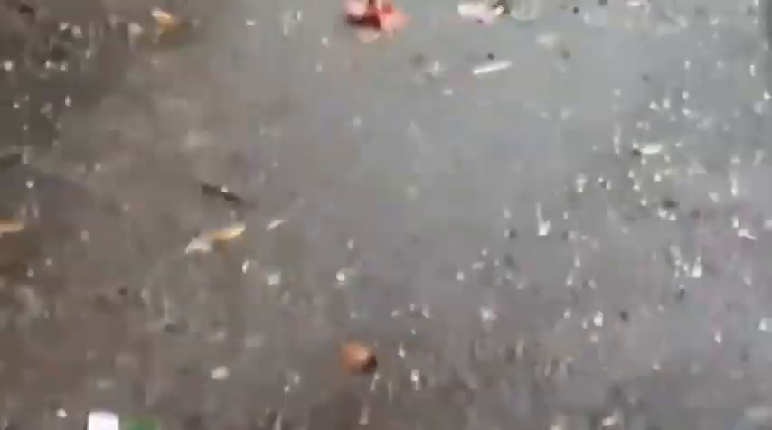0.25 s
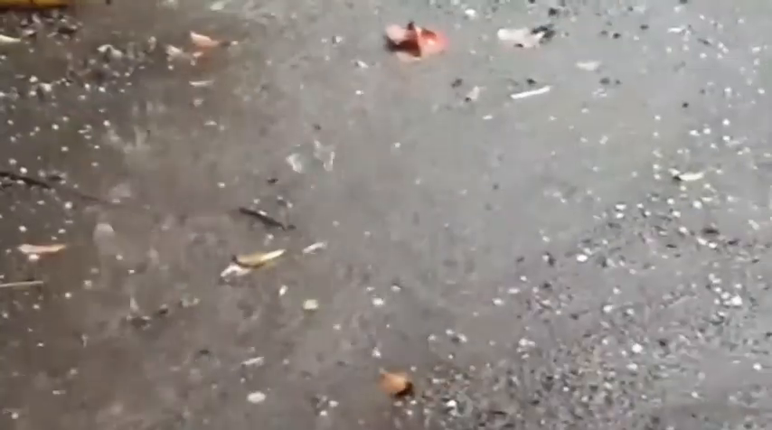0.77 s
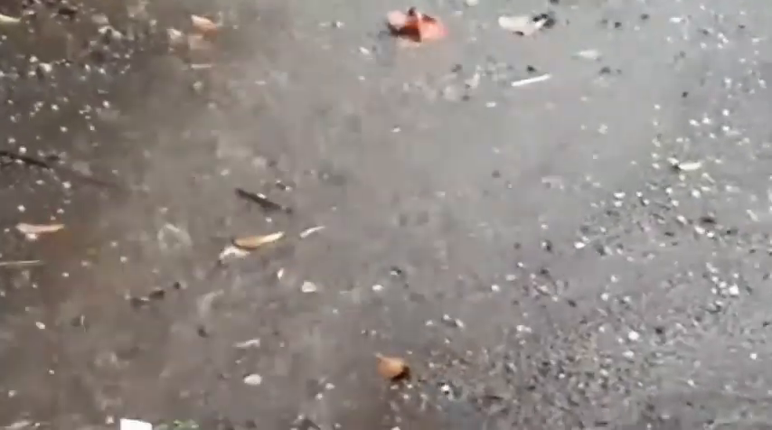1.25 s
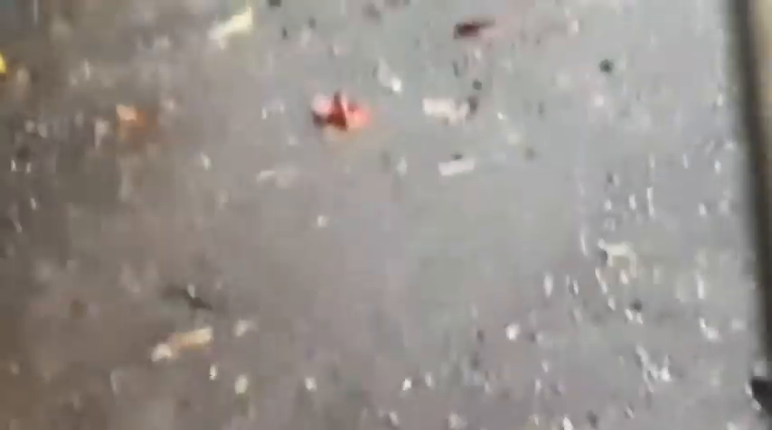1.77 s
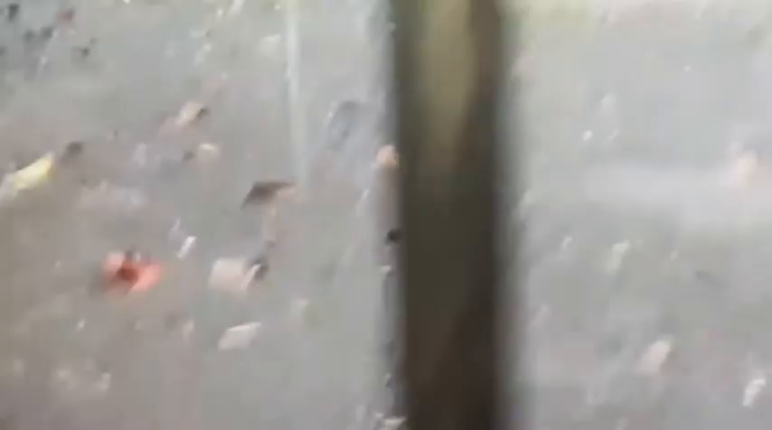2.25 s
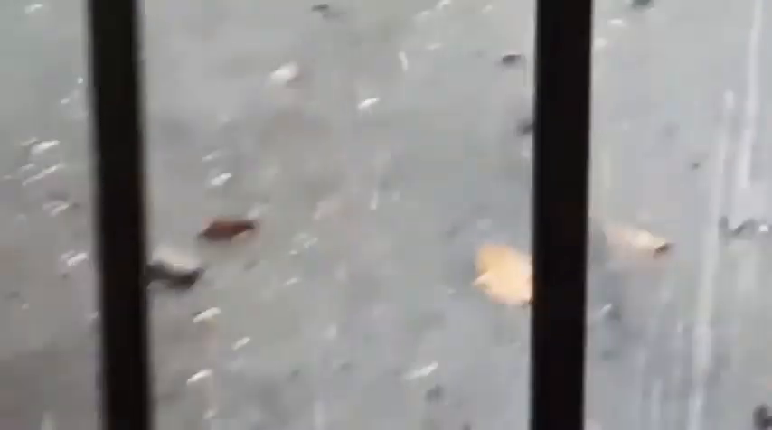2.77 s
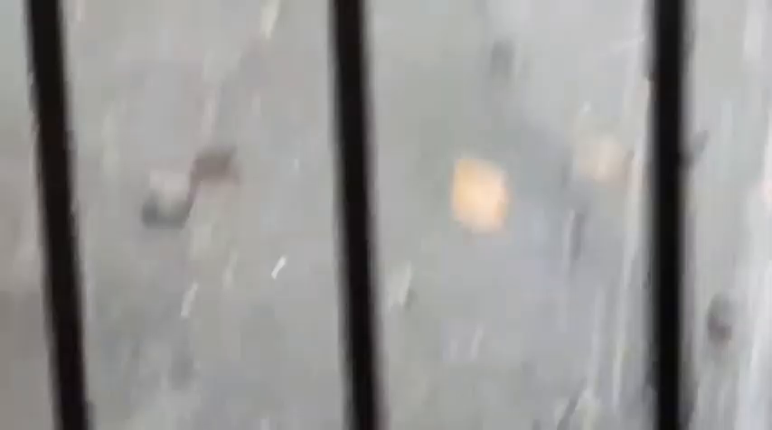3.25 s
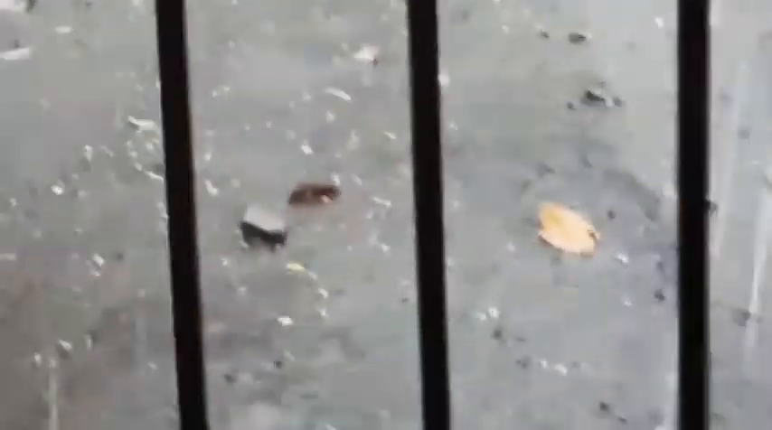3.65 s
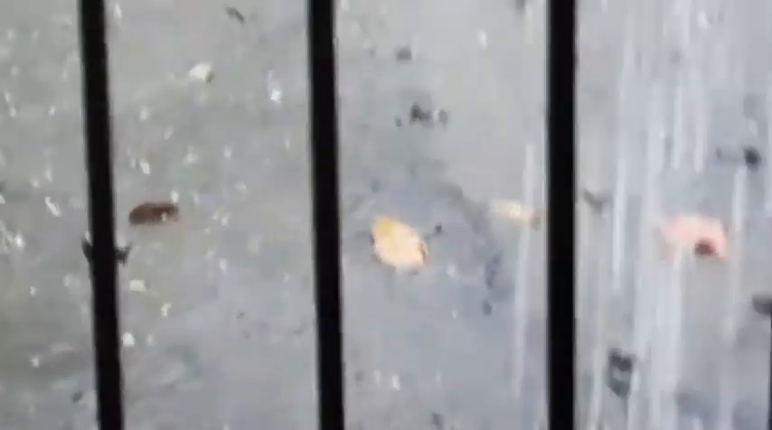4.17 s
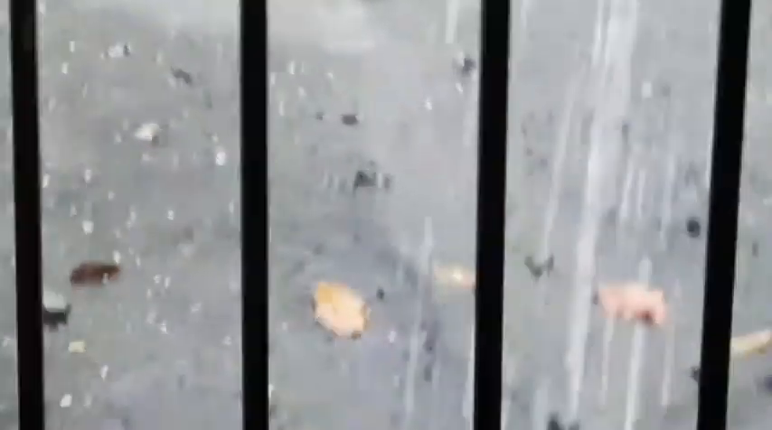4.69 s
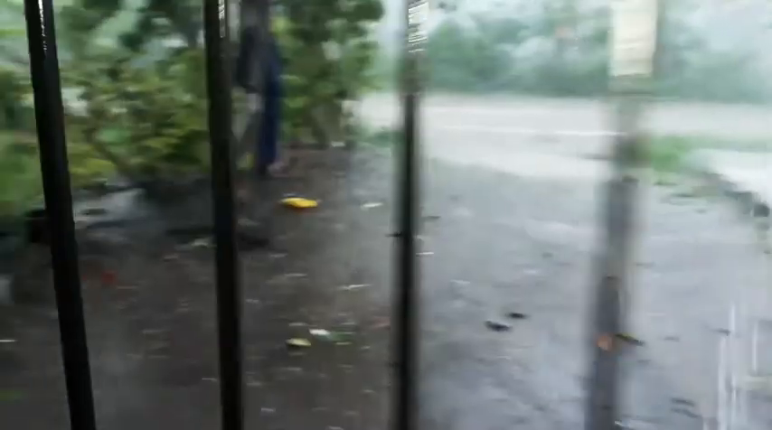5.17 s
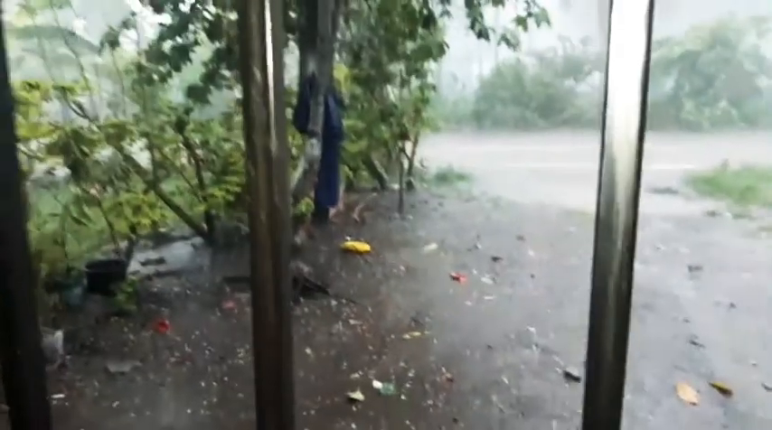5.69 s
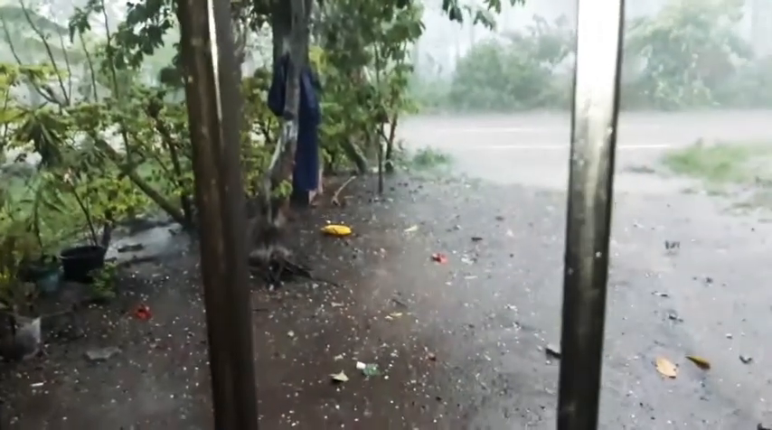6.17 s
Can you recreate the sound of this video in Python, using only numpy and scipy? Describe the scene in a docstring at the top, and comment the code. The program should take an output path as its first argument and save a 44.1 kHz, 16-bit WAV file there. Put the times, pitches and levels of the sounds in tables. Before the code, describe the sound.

Continuous hailstorm outdoors under a sheltering roof. Countless tiny ice hits merge into a rough roar, with uneven bursts of clatter, dull thuds, wet splats and crisp ticks standing out near the microphone. The fall eases midway and strengthens again. Near the end the sound vanishes for a twentieth of a second, then comes back stronger and steadier, facing an open yard with bushes.

```python
"""Hail and heavy rain, heard from a barred doorway over a wet concrete yard with bushes.
Countless random impacts, coloured by the surface they hit, merge into a roar; damped tones tick through it.
The roof drums, big stones burst into clatter and thud, water slaps the ground, lone hits crack and knock.
The fall slackens midway; near the end the sound drops out for an instant and returns facing the open yard."""
import sys
import numpy as np
from scipy import signal
from scipy.fft import rfft, irfft
from scipy.io import wavfile

SR = 44100
rng = np.random.default_rng(int(sys.argv[2]) if len(sys.argv) > 2 else 0)


def generate_wav(signal):
    """Clip the signal to [-1, 1] and save it as 16-bit WAV at the path in sys.argv[1]."""
    frames = np.transpose(np.atleast_2d(signal))
    scaled = np.clip(frames, -1, 1) * 32767
    pcm = np.round(scaled).astype(np.int16)
    wavfile.write(sys.argv[1], SR, pcm)


N = 284004
TIME = np.arange(N) / SR

# Near-mute before the sound returns facing the yard: start in seconds, end in seconds.
DROPOUT_S = (5.089, 5.1425)
# Roof colour in the doorway. Each row: frequency in Hz, relative density in dB per Hz.
ROOF = [(25, -35), (55, -34), (85, -12.5), (110, -6.5), (160, -5.5), (230, -2), (290, -5), (380, 1.5),
        (455, -6.5), (510, -1.5), (630, -2), (750, -2.5), (1200, -26), (3000, -51)]
# Splash colour. Each row: frequency in Hz, relative density in dB per Hz.
SPLASH = [(1500, -32), (2800, -0.5), (3800, 0.5), (5000, -1.5), (6500, -9), (9000, -16), (16000, -17.5)]
# Fine-spray colour. Each row: frequency in Hz, relative density in dB per Hz.
SPRAY = [(2000, -15), (4000, 0), (6500, -13.5), (10000, -0.5), (12200, 3), (14500, -1.5), (16000, -15.5)]


def from_db(db):
    """Decibels to gain."""
    return 10 ** (np.asarray(db) / 20)


def rms_one(x):
    """Scale to rms 1."""
    return x / np.sqrt(np.mean(x ** 2) + 1e-20)


def drift(rate_hz):
    """Smooth random signal of spread about 1: noise through two equal low-pass poles at rate_hz."""
    step, settle = 40, 2000    # samples per slow point; slow points discarded
    pole = np.exp(-2 * np.pi * rate_hz * step / SR)
    noise = rng.standard_normal(N // step + settle + 2)
    slow = signal.lfilter([1], [1, -2 * pole, pole * pole], noise)[settle:]
    return np.interp(np.arange(N) / step, np.arange(len(slow)), rms_one(slow))


def colour(x, spectrum, size=4096):
    """Causal (minimum-phase) filter that follows a spectrum, so that impacts keep a sharp front."""
    hz, db = np.transpose(spectrum)
    grid_hz = np.maximum(np.arange(size // 2 + 1) * SR / size, 1)
    grid_db = np.interp(np.log(grid_hz), np.log(hz), db)
    cepstrum = irfft(np.log(from_db(grid_db)))
    # fold the cepstrum onto positive time
    cepstrum[1:size // 2] *= 2
    cepstrum[size // 2 + 1:] = 0
    response = irfft(np.exp(rfft(cepstrum)))
    return signal.oaconvolve(x, response)[:N]


def impacts(per_s, spread_db, wash_db):
    """Random impacts of uneven size over the smooth wash of those too far to tell apart; rms 1."""
    size_db = spread_db * np.minimum(rng.exponential(1, N), 4)
    sizes = from_db(size_db) * rng.choice([-1, 1], N)
    near = rms_one(sizes * (rng.random(N) < per_s / SR))
    return rms_one(near + from_db(wash_db) * rng.standard_normal(N))


def shower(excitation, spectrum):
    """Impacts take the colour of the surface they land on; rms 1."""
    return rms_one(colour(excitation, spectrum))


def pings(per_s, low_hz, high_hz, cycles, range_db=10, samples=2400):
    """Short damped tones of random pitch and strength, falling 60 dB in the given cycles; rms 1."""
    out, age = np.zeros(N + samples), TIME[:samples]
    when, pitch, weakness = rng.random((int(per_s * N / SR), 3)).T
    hz = (low_hz * (high_hz / low_hz) ** pitch)[:, None]
    strength = from_db(-range_db * weakness[:, None])
    decay = np.exp(-np.log(1000) * age * hz / cycles)
    tones = strength * decay * np.sin(2 * np.pi * hz * age)
    for start, tone in zip((when * N).astype(int), tones):
        out[start:start + samples] += tone
    return rms_one(out[:N])


def facing_yard():
    """0 in the doorway, 1 from the start of the dropout, when the microphone faces the open yard."""
    return 1.0 * (TIME > DROPOUT_S[0])


def turn_share():
    """Share of the microphone's turn along the bars, ramping from 0 to 1."""
    # Span of the turn: start in seconds, end in seconds.
    turn_s = (2.25, 3.3)
    return np.interp(TIME, turn_s, [0, 1])


def vigour():
    """How far the downpour is above its usual strength, in dB."""
    usual_db = -14.5
    # Slackens around 3 s, then picks up. Each row: time in seconds, strength in dB.
    strength = [(0.0, -13.5), (0.95, -13), (1.43, -15.5), (2.33, -14), (2.64, -16), (3.3, -17), (3.7, -15),
                (4.1, -13), (4.39, -16), (5.2, -11.5), (5.35, -12.5), (6.17, -13.5), (6.44, -13.5)]
    return np.interp(TIME, *np.transpose(strength)) - usual_db


def loudness(mix):
    """Layer gain. Mix: dB at usual vigour, dB per dB of vigour, dB gained by the turn, further dB in the yard."""
    usual_db, follows, turned_db, yard_db = mix
    return from_db(usual_db + follows * vigour() + turned_db * turn_share() + yard_db * facing_yard())


def flurries(per_s, t60_s, depth_db):
    """Gain of random clumps of impacts, each arriving at once and thinning out; steadier in the yard."""
    yard_depth_share = 0.53
    clumps = (rng.random(N) < per_s / SR) * rng.uniform(.5, 1, N)
    fading = signal.lfilter([1], [1, -from_db(-60 / (t60_s * SR))], clumps + 1e-18)
    share = 1 + (yard_depth_share - 1) * facing_yard()
    return from_db(depth_db * share * rms_one(fading - fading.mean()))


def roof_drumming():
    """Stones drum on the roof, whose hollow colour shifts as the microphone turns."""
    # Roof after the turn. Each row: frequency in Hz, relative density in dB per Hz.
    turned_colour = [(25, -33), (55, -44), (85, -13), (115, -9.5), (157, -1.5), (210, -2.5), (265, -6),
                     (325, 1), (390, -6), (450, 2.5), (520, -5), (600, -2), (750, -5.5), (1200, -22),
                     (3000, -58)]
    # Roof facing the yard, its resonances more even. Each row: frequency in Hz, relative density in dB per Hz.
    yard_colour = [(25, -40), (55, -42), (85, -11), (120, -9.5), (160, -3), (220, -2.5), (290, -2.5),
                   (370, -1.5), (430, -1.5), (520, -5), (600, -1), (750, -2), (1200, -18), (3000, -49)]
    # Layer gain, columns as in loudness [dB, dB per dB, dB, dB].
    mix = (-29.5, 1, 1.5, -1.5)
    hits, turned = impacts(500, 3.4, 0.77), turn_share()
    doorway = (1 - turned) * shower(hits, ROOF) + turned * shower(hits, turned_colour)
    body = np.where(facing_yard() > 0, shower(hits, yard_colour), doorway)
    ringing = from_db(-7.0) * pings(70, 296.4, 702, cycles=68, samples=5000)
    return loudness(mix) * (body + ringing) * flurries(55, t60_s=0.07, depth_db=0.8)


def far_roar():
    """Far impacts merge into a coloured roar with ringing hits in it."""
    # Roar colour. Each row: frequency in Hz, relative density in dB per Hz.
    spectrum = [(200, -23), (500, -20), (750, -4.5), (1000, 0.5), (1350, -3), (2000, -4), (4000, -13.5),
                (8000, -39)]
    # Layer gain, columns as in loudness [dB, dB per dB, dB, dB].
    mix = (-28, 0.5, 2.5, 3)
    ringing = from_db(-5.0) * pings(170, 800, 1817, cycles=99, samples=3000)
    roar = shower(impacts(900, 1.5, 1), spectrum) + ringing
    return loudness(mix) * roar * flurries(80, t60_s=0.096, depth_db=1.7)


def pelting(near):
    """Hail hits concrete: coloured impacts and damped tones."""
    # Concrete colour. Each row: frequency in Hz, relative density in dB per Hz.
    spectrum = [(400, -48.5), (1100, -7), (1600, -4.5), (2150, -1), (2850, -3.5), (4000, -9.5),
                (5200, -15.5), (8000, -39)]
    # Layer gain, columns as in loudness [dB, dB per dB, dB, dB].
    mix = (-19, 0.91, -1.2, 2.25)
    ringing = from_db(-7.0) * pings(260, 1602.6, 3646, cycles=230, samples=3500)
    hail = shower(impacts(2000, 1.2, 1), spectrum) + ringing
    return loudness(mix) * hail * near * flurries(130, t60_s=0.068, depth_db=0.98)


def splashes(near):
    """Water splashes nearby while single pellets tick on the concrete."""
    # Layer gain, columns as in loudness [dB, dB per dB, dB, dB].
    mix = (-24, 1.6, -1, 1.6)
    pellets = from_db(-14.0) * pings(300, 2755, 6330, cycles=70, range_db=12, samples=800)
    splash = shower(impacts(2000, 2.1, 3.9), SPLASH) + pellets
    return loudness(mix) * splash * near * flurries(60, t60_s=0.1, depth_db=2.0)


def fine_spray(near):
    """Fine spray flickers in level; its smallest droplets only click."""
    # Layer gain, columns as in loudness [dB, dB per dB, dB, dB].
    mix = (-29, 0.8, 1, -1.5)
    droplets = from_db(-13.5) * pings(110, 10160, 15000, cycles=260, range_db=18, samples=500)
    spray = shower(impacts(900, 0.59, 1), SPRAY) + droplets
    flicker = from_db(0.93 * drift(13))
    return loudness(mix) * spray * near * flurries(33, t60_s=0.1, depth_db=0.84) * flicker


def downpour():
    """The steady fall; the nearest clumps are heard in all the bright layers at once."""
    near = flurries(60, t60_s=0.11, depth_db=0.95)
    return roof_drumming() + far_roar() + pelting(near) + splashes(near) + fine_spray(near)


def bursts(times_s, levels_db, lengths_s, rise_s):
    """Envelope of volleys that set in at once, hold and die away, adding in power."""
    power = np.zeros(N)
    for s, db, length_s in zip(times_s, levels_db, lengths_s):
        start = max(int(s * SR), 0)
        age = TIME[:min(N - start, SR // 2)]
        envelope = (1 - np.exp(-age / rise_s)) * np.exp(-(age / length_s) ** 2)
        power[start:start + len(age)] += (from_db(db) * envelope) ** 2
    return np.sqrt(power)


def scatter():
    """Droplets and chips of ice thrown over the concrete; rms 1."""
    fine = shower(impacts(2000, 1.5, 0), SPRAY)
    coarse = shower(impacts(2000, 0.93, 1), SPLASH)
    return rms_one(fine + from_db(5.5) * coarse)


def lesser_stones():
    """Rows like those of the big stones, loosely spread in time and stronger when the fall is harder."""
    per_s, length_s = 9.3, 0.064
    usual_db, spread_db, yard_db, thud_rel_db = -27, 3.5, 2.5, -10.5
    count = int(per_s * N / SR)
    when, strength = rng.random((count, 2)).T
    s = (np.arange(count) + when) / count * N / SR
    follow_db = np.interp(s, TIME, vigour() + yard_db * facing_yard())
    db = usual_db + follow_db + spread_db * (2 * strength - 1)
    return np.column_stack([s, db, db + thud_rel_db, np.full(count, length_s)])


def hailstones():
    """Stones thud, rattle the surface they hit and throw a spray in proportion to the clatter."""
    # Biggest stones. Each row: start in seconds, clatter in dB, thud in dB, decay length in seconds.
    big_stones = [(0.002, -14, -20, 0.024), (0.083, -34, -23, 0.029), (0.295, -15, -24.5, 0.071),
                  (0.355, -16.5, -26, 0.11), (0.549, -14.5, -21, 0.05), (0.599, -14, -37, 0.084),
                  (0.774, -18, -34, 0.046), (0.885, -19, -33, 0.1), (0.954, -15.5, -24.5, 0.092),
                  (1.082, -14.5, -30, 0.087), (1.185, -14, -28, 0.07), (1.386, -18.5, -42, 0.096),
                  (1.612, -14.5, -40, 0.054), (1.678, -15.5, -29, 0.036), (1.758, -18, -24.5, 0.094),
                  (1.908, -18.5, -35, 0.058), (2.04, -19.5, -48, 0.11), (2.102, -19, -37, 0.052),
                  (2.161, -12.5, -31, 0.049), (2.253, -19, -30, 0.032), (2.287, -17.5, -41, 0.068),
                  (2.449, -16.5, -30, 0.03), (2.894, -16, -22, 0.018), (2.967, -26, -30, 0.067),
                  (3.408, -17.5, -35, 0.077), (3.435, -20.5, -25, 0.064), (3.785, -20.5, -33, 0.19),
                  (3.931, -17.5, -29, 0.18), (4.008, -19, -30, 0.034), (4.066, -18, -32, 0.032),
                  (4.134, -18.5, -40, 0.17), (4.272, -16, -27, 0.2), (4.433, -17.5, -27, 0.3),
                  (4.775, -18, -32, 0.29), (4.953, -13.5, -40, 0.022), (5.15, -23.5, -30, 0.19)]
    # Rattle colour. Each row: frequency in Hz, relative density in dB per Hz.
    spectrum = [(300, -44.5), (900, 0.5), (1400, -0.5), (2100, 4.5), (2900, 0.5), (4200, -6), (6500, -30),
                (16000, -20)]
    s, clatter_db, thud_db, lengths_s = np.vstack([big_stones, lesser_stones()]).T
    ringing = from_db(-16.0) * pings(400, 1480, 3370, cycles=80)
    rattle = rms_one(shower(impacts(2500, 2.0, 0), spectrum) + ringing)
    thrown = from_db(-8) * scatter()
    clatter = bursts(s, clatter_db, lengths_s, rise_s=0.0006) * (rattle + thrown)
    thud = bursts(s, thud_db, lengths_s, rise_s=0.0044) * shower(impacts(800, 1.7, 2.7), ROOF)
    return clatter + thud


def splats():
    """Gushes of water slap the concrete and break into bright spray, without clatter."""
    # Each row: start in seconds, level in dB, decay length in seconds.
    gushes = [(0.07, -21.5, 0.12), (0.152, -17.5, 0.17), (0.685, -23, 0.058), (0.771, -18.5, 0.031),
              (1.905, -19, 0.049), (2.256, -21, .04), (2.378, -17.5, 0.042), (2.53, -23, 0.051),
              (2.572, -21, 0.034), (2.97, -20, 0.033), (3.56, -26, 0.088), (3.922, -19, 0.034),
              (4.714, -16, 0.016), (4.923, -24, 0.063), (5.137, -24, .1), (5.207, -18, 0.052)]
    s, db, lengths_s = np.transpose(gushes)
    return bursts(s, db, lengths_s, rise_s=0.0033) * scatter()


def ticks(rows, t60_s):
    """Lone impacts: a sharp front and a few slightly detuned partials that die together."""
    # Each row: ratio to the pitch, level in dB.
    partials = [(.78, -17), (1.0, 1), (1.19, -6)]
    out, age = np.zeros(N + SR), TIME[:SR // 6]
    for s, db, hz in rows:
        start = int(s * SR)
        ring = np.zeros(len(age))
        for ratio, part_db in partials:
            partial_hz = hz * ratio * rng.normal(1, 0.022)
            ring += from_db(part_db) * np.sin(2 * np.pi * partial_hz * age)
        out[start:start + len(age)] += from_db(db - 60 * age / t60_s) * ring / np.abs(ring).max()
    return out[:N]


def cracks():
    """Single pellets crack on the concrete close by."""
    # Each row: start in seconds, peak before decay in dB, pitch in Hz.
    pellets = [(0.089, -11, 3600), (0.302, -5, 3380), (0.55, -17, 2720), (0.693, -9, 3830),
               (0.905, -6, 3240), (0.959, -2, 2490), (1.005, -1, 3300), (1.086, -2, 2900),
               (1.123, -2, 3260), (1.186, -5, 2080), (1.677, -6, 2300), (2.105, -5, 3160),
               (2.153, -2, 2600), (2.449, 0.5, 2500), (2.581, -6, 2950), (2.981, -3, 3010),
               (3.456, -7, 2880), (3.792, -7, 2500), (3.935, -5, 3370), (3.966, -2, 3500),
               (4.013, -6, 3120), (4.076, -4, 3000), (4.593, 0.5, 2570), (4.716, -3, 3900),
               (4.845, -1, 2630), (4.908, -5, 2220), (4.966, -1, 3470), (6.337, -4, 2490)]
    return ticks(pellets, t60_s=0.013)


def knocks():
    """Heavier stones knock on hard surfaces nearby, ringing longer."""
    # Each row: start in seconds, peak before decay in dB, pitch in Hz.
    stones = [(0.314, -14, 1770), (0.560, -5, 1940), (1.185, -2, 1860), (1.623, -8, 1750),
              (2.169, -8, 2190), (2.465, -8, 1870), (2.838, -9, 2030), (2.897, -13, 2020),
              (3.414, -14, 1970), (3.441, -11, 1010), (4.136, -8, 1980), (4.362, -7, 1120),
              (5.290, -2, 2040), (6.367, -10, 2370), (6.402, -12, 950)]
    return ticks(stones, t60_s=0.035)


def thumps():
    """Single stones thump on the roof, low and slow to decay."""
    # Each row: start in seconds, peak before decay in dB, pitch in Hz.
    stones = [(0.315, -11, 366), (0.360, -14, 646), (0.553, -17, 537), (0.613, -15, 366), (1.180, -14, 351),
              (1.759, -19, 393), (1.792, -20, 510), (2.109, -14.5, 360), (4.318, -14, 437),
              (5.183, -15, 586)]
    return ticks(stones, t60_s=0.1)


def snaps():
    """Single droplets snap right by the microphone, high and very short."""
    # Each row: start in seconds, peak before decay in dB, pitch in Hz.
    droplets = [(0.651, -6, 13000), (0.774, -11, 12500), (2.195, -13, 12000), (2.3905, -3, 12700),
                (2.425, -13, 12500), (2.535, -10, 13000), (2.581, -10, 12500), (2.984, -8, 12000),
                (3.425, -13, 12000), (3.573, -5, 14000), (3.927, -9, 11900), (4.956, -10, 12000)]
    return ticks(droplets, t60_s=0.009)


def off_the_wall(x):
    """A nearby wall's short echo, its delay moving with the microphone, hollows the storm at near-equal power."""
    # Each row: time in seconds, delay in seconds, reflection in dB.
    wall = [(2.3, 0.00096, -32), (2.7, 0.00106, -17), (3.5, 0.00107, -20), (4.1, 0.0012, -32),
            (5.0, .00105, -28), (5.2, 0.00095, -33)]
    s, delay_s, db = np.transpose(wall)
    gain = from_db(np.interp(TIME, s, db))
    echo = np.interp(TIME - np.interp(TIME, s, delay_s), TIME, x)
    return (x + gain * echo) / np.sqrt(1 + gain ** 2)


def booms():
    """Low notes of wavering phase swell briefly out of the drumming."""
    # Each row: centre in seconds, pitch in Hz, rms level in dB, swell length in seconds.
    notes = [(4.462, 449, -25.5, 0.08), (4.78, 409, -29, 0.19), (4.907, 154, -30.5, 0.23)]
    out = np.zeros(N)
    for s, hz, db, length_s in notes:
        swell = np.exp(-(2 * (TIME - s) / length_s) ** 2)
        phase = 2 * np.pi * hz * TIME + 0.53 * drift(16)
        out += from_db(db) * swell * np.sqrt(2) * np.sin(phase)
    return out


def bushes():
    """Dense, steady patter on leaves, heard when the microphone faces the yard."""
    # Leaf colour. Each row: frequency in Hz, relative density in dB per Hz.
    spectrum = [(600, -35), (1200, -7), (1550, -1), (1800, -0.5), (2050, 2), (2450, -2), (3200, -9),
                (4300, -21), (5500, -9), (7500, -37)]
    ringing = from_db(-12) * pings(260, 1450, 2580, cycles=73)
    patter = rms_one(shower(impacts(3500, 1.1, 2), spectrum) + ringing)
    return from_db(-18) * facing_yard() * patter


def scene():
    """All of the storm at one microphone."""
    storm = off_the_wall(downpour() + hailstones())
    lone = cracks() + knocks() + thumps() + snaps()
    return (storm + splats() + lone + booms() + bushes())[None]


def record(dry):
    """The port notches the treble, rumble is cut, peaks are rounded, the sound drops out once, the top is cut."""
    rumble_cut_hz, top_cut_hz, ceiling = 94, 15850, .98
    # Microphone port response. Each row: frequency in Hz, gain in dB.
    port = [(5500, 1), (7000, 1.5), (7600, -5), (8000, -25), (8600, -21.5), (9100, -10), (9900, -1.5),
            (11500, 1.5)]
    high_pass = signal.butter(2, rumble_cut_hz, "high", fs=SR, output="sos")
    heard = signal.sosfilt(high_pass, colour(dry[0], port))
    rounded = heard / (1 + (heard / ceiling) ** 10) ** (1 / 10)
    dropped = (TIME > DROPOUT_S[0]) & (TIME < DROPOUT_S[1])
    live = np.where(dropped, from_db(-60), 1)
    low_pass = signal.ellip(12, .2, 90, top_cut_hz, fs=SR, output="sos")
    return signal.sosfilt(low_pass, rounded * live)[None]


dry = scene()
out = record(dry)
generate_wav(out)
```